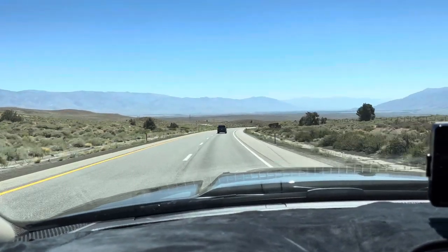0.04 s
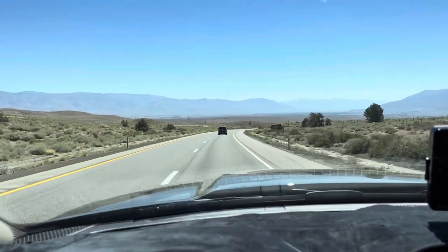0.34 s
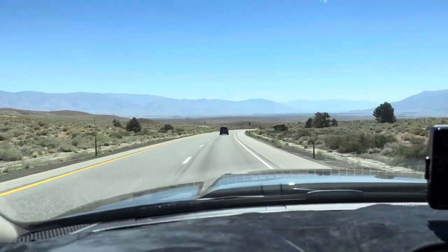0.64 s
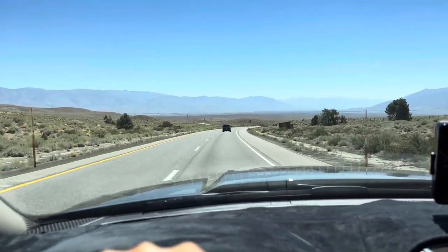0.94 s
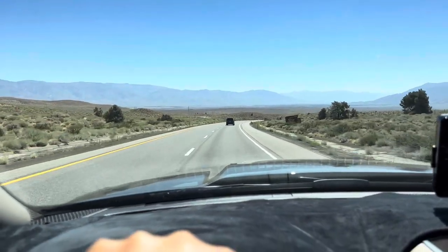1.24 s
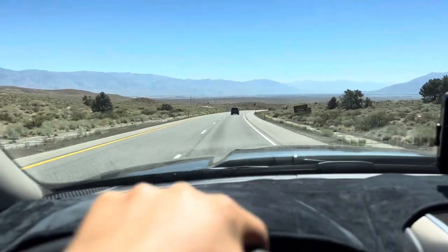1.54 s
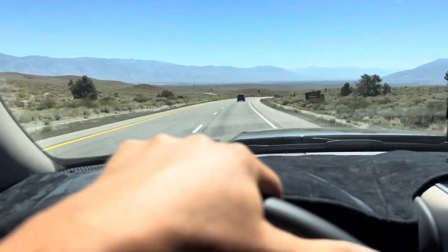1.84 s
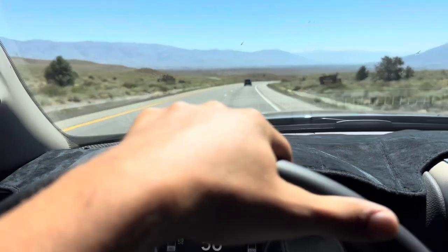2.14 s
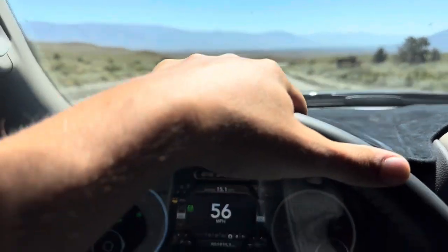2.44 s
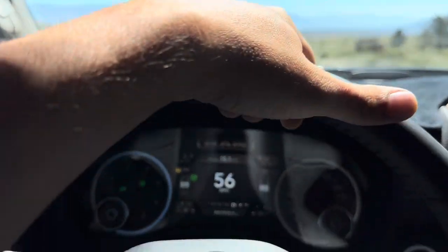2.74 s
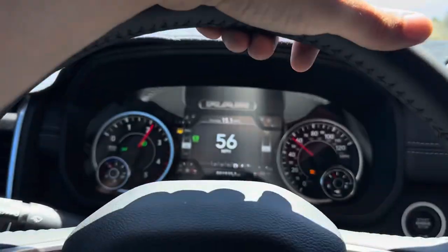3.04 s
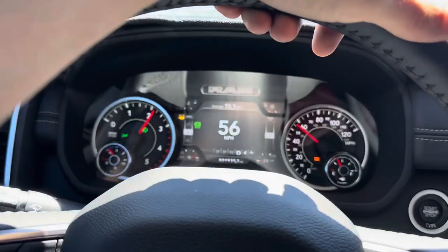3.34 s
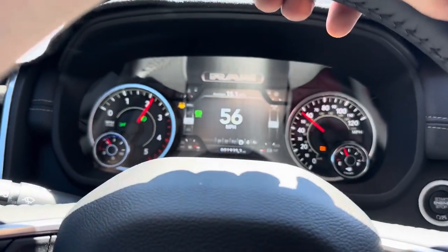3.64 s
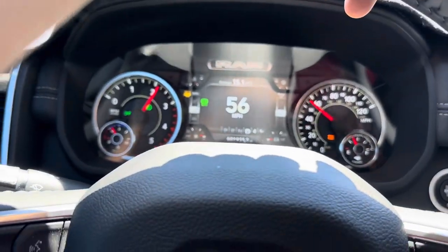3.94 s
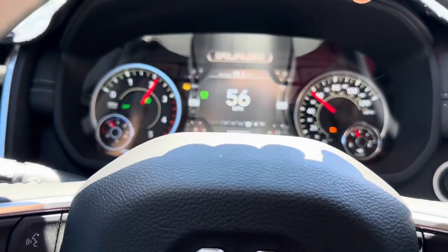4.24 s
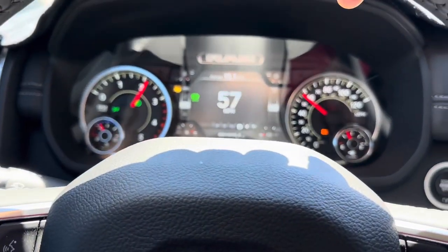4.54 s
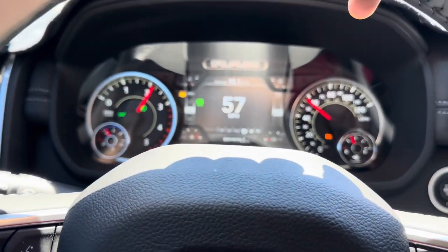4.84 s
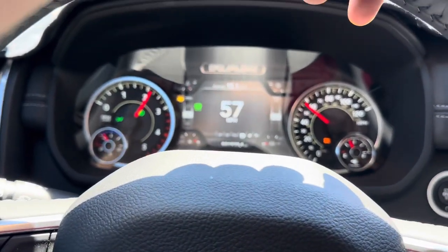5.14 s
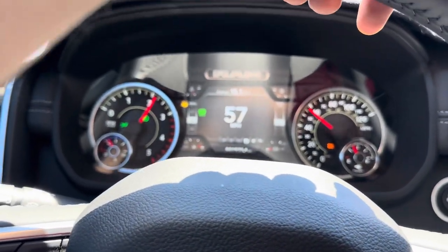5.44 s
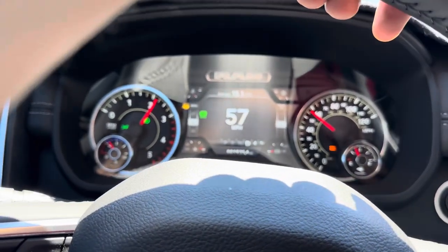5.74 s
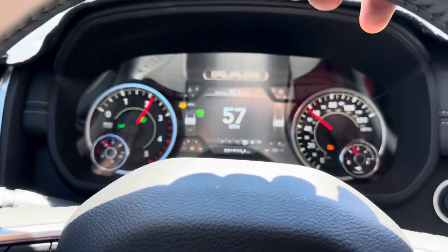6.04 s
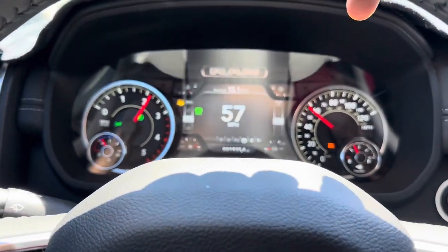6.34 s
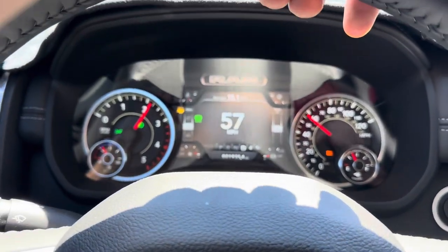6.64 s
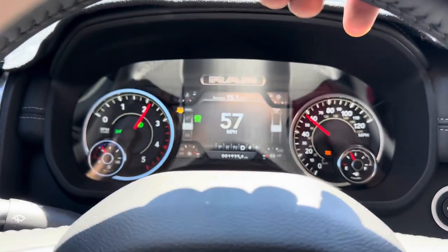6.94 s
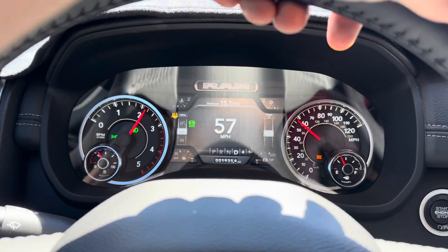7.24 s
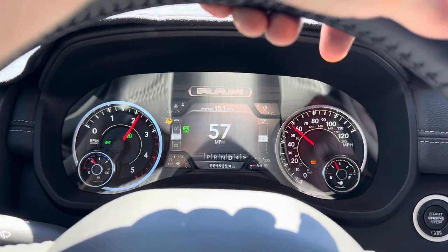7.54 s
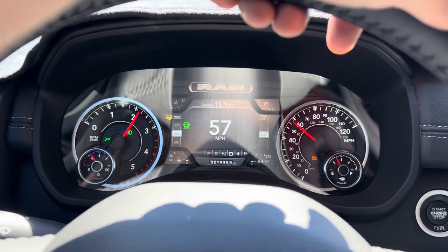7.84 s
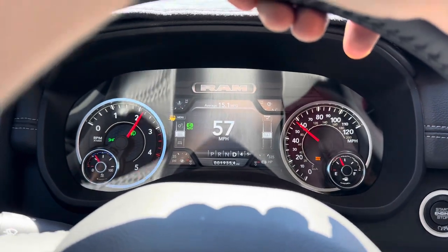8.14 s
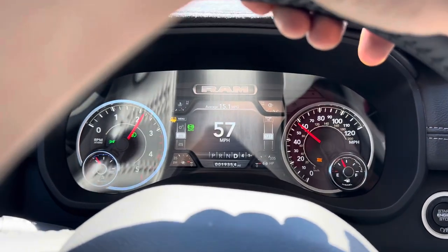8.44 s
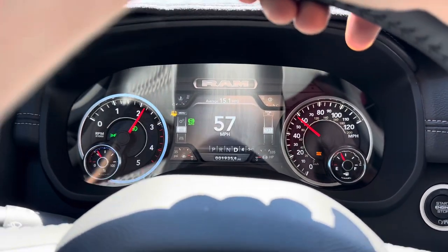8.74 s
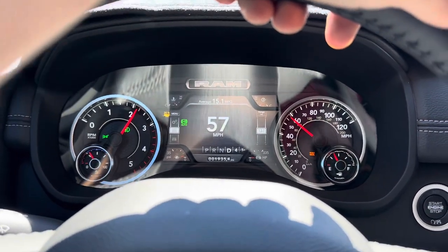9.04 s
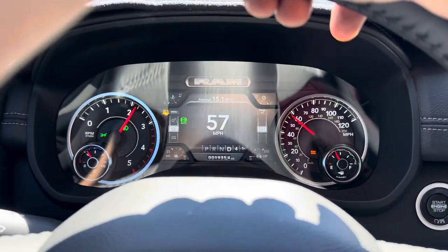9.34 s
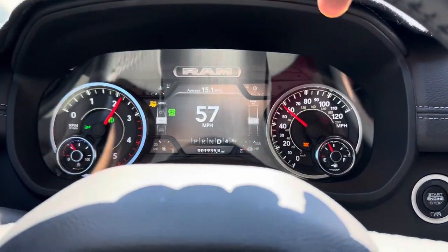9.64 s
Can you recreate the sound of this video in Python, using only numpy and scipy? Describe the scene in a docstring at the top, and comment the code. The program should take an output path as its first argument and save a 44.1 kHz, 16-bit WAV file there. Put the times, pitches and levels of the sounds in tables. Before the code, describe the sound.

Steady diesel engine hum and booming road rumble heard inside a moving truck, with soft air buffeting and light trim ticks.

```python
"""A six-cylinder diesel engine drones near 2180 rpm, holding back a pickup and trailer on a long downhill.
Inside the cab, the road shakes the air into a low boom, which throbs against an engine tone.
Tyres and wind roar outside, plastic trim ticks now and then, and a thin whistle comes and goes.
About two seconds in, the microphone moves from the windscreen to the steering wheel,
where a draught brushes its two openings."""
import sys
import numpy as np
from scipy import signal
from scipy.fft import rfft, irfft, next_fast_len
from scipy.io import wavfile
from scipy.ndimage import uniform_filter1d, map_coordinates

SR = 44100
rng = np.random.default_rng(int(sys.argv[2]) if len(sys.argv) > 2 else 0)


def put_to_file(sound):
    """Save the sound as 16-bit audio at rate SR, in the file named by the first command-line argument."""
    columns = np.atleast_2d(sound).T  # one column per channel
    safe = np.clip(columns, -1, 1)
    whole_steps = np.round(safe * 32767)
    wavfile.write(sys.argv[1], SR, whole_steps.astype(np.int16))


N = 432180


# Swells of the engine's 163 Hz hum. Each row: middle in seconds, lift in dB.
HUM_SWELLS = [(2.6, 5.5), (3.35, 1.5), (4.5, 4), (5.07, 7), (5.35, 3.5), (5.9, 3), (6.5, 4), (6.8, 9.5),
              (8.3, 4.5), (8.85, 2.5), (9.38, 6), (9.62, 5.5)]
# Rise and fall of its 400 Hz note. Each row: time in seconds, lift in dB.
NOTE_LIFT = [(0, 0.5), (2, 1), (3.2, 4.5), (4.1, 6.5), (5, 3.5), (6.6, 2), (7.2, -3.5), (9.8, -3.5)]
def engine(turns, place):
    """The braking engine drones into the cab. One tone matches a pitch the cab rings at, and swells."""
    hum = engine_tones(turns, place, [4.5], waver_db=1, drift=.01)
    note = engine_tones(turns, place, [11], waver_db=1.5, drift=.02)
    others = [row[0] for row in ENGINE_TONES if row[0] not in (2, 4.5, 11)]  # 2 plays in cab_boom
    rest = engine_tones(turns, place, others, waver_db=1.2, drift=.02)
    swells_db = sum(lift_db * hump(s, width_s=.11) for s, lift_db in HUM_SWELLS)
    hum_db = blend(-0.4, -1.0, place) + swells_db
    return amp(hum_db) * hum + amp(curve(NOTE_LIFT)) * note + amp(1) * rest


# Engine tones, with gear whine at the top. Each row: order (vibrations per engine turn), then
# starting levels in dB: left and right at the windscreen, left and right at the wheel.
ENGINE_TONES = [(1.0, -47.5, -52, -50, -41), (1.5, -49, -49, -33.5, -39), (2.0, -26.5, -28.5, -23, -30),
                (2.5, -46, -36.5, -39, -40.5), (3.0, -42, -42, -39.5, -43), (3.5, -32.5, -36, -35, -32.5),
                (4.0, -45.5, -48.5, -42.5, -44.5), (4.5, -23, -26.5, -32, -37),
                (5.0, -40.5, -47, -39.5, -44.5), (5.5, -49.5, -61, -47, -49), (6.0, -38, -47, -45, -50.5),
                (6.5, -52.5, -65.5, -46.5, -53), (7.5, -44.5, -55, -58.5, -59.5),
                (8.5, -59, -50, -62.5, -61.5), (10.0, -65, -52.5, -52, -53),
                (11.0, -51, -45.5, -51.5, -50.5), (12.0, -80.5, -62, -56, -57.5),
                (18.5, -61.5, -62.5, -59, -58.5), (19.0, -61, -62.5, -58, -59),
                (21.0, -58.5, -56.5, -63, -64), (72.1, -96, -96, -85, -83.5),
                (108.0, -96.5, -96.5, -89, -91)]
def engine_tones(turns, place, orders, waver_db, drift):
    """Tones that follow the engine's speed. Echoes in the cab make each louder in some places."""
    out = np.zeros((2, N))
    for order, *levels in ENGINE_TONES:
        if order not in orders:
            continue
        screen, wheel = amp(levels).reshape(2, 2, 1)
        per_turn = round(2 * order) / 2  # halves, as one engine cycle lasts two turns
        phase = 2 * np.pi * (per_turn * turns + rng.random()) + drift * per_turn * wobble(4)
        lead = rng.normal(0, 0.091 * per_turn) * np.array([[1], [-1]])  # left and right are out of step
        level = blend(screen, wheel, place) * amp(waver_db * wobble(5.4))
        out += level * np.sqrt(2) * np.sin(phase + lead)
    return out


# Engine speed. Each row: time in seconds, turns per minute.
ENGINE_RPM = [(0.35, 2178), (1, 2165), (1.6, 2153), (2.6, 2163), (3.4, 2183), (4.3, 2180.0), (5.1, 2185),
              (5.9, 2193), (6.8, 2202), (8.2, 2220), (9.4, 2207.0)]
def engine_turns():
    """How many times the engine has turned so far, at each sample."""
    return np.cumsum(curve(ENGINE_RPM)) / 60 / SR


# Low pitches the cab's air rings at. Each row: pitch in Hz, width in Hz, relative strength in dB.
CAB_RINGS = [(60.3, 16, -4.5), (70, 14, -1)]
# How hard the road shakes the cab. Each row: time in seconds, relative level in dB.
ROAD_SHAKE = [(0, -19.5), (1.8, -21.5), (2.15, -15.5), (2.6, -21), (6.1, -21.5), (7.1, -18.5), (8.8, -22),
              (9.3, -19.5), (9.8, -17)]
def cab_boom(turns, place):
    """The road shakes the cab's air into a rumble, which throbs against a low engine tone."""
    air = ringing(CAB_RINGS)
    rumble = amp(-21.5) * unit(noise(air) + amp(-7.5) * noise(air, channels=2))
    hum = engine_tones(turns, place, [2], waver_db=-0.5, drift=0.16)
    shake_db = curve(ROAD_SHAKE) + wobble(11) - 2
    return amp(shake_db) * steadied(rumble + hum, seconds=0.13)


# The boom's strongest throbs. Each row: middle in seconds, peak level in dB, width in seconds.
BOOM_THROBS = [(0.205, -16.5, 0.034), (0.517, -9, 0.0096), (0.636, -13, 0.027), (0.794, -12.5, 0.018),
               (1.297, -12.5, 0.012), (1.53, -13, .014), (2.018, -14.5, .016), (2.087, -12.5, .016),
               (2.227, -10.5, 0.0085), (2.387, -13.5, 0.023), (2.773, -13.5, 0.012), (3.011, -13, 0.012),
               (3.24, -12.5, 0.017), (3.439, -12, 0.036), (3.777, -14.5, 0.041), (4.041, -12.5, 0.044),
               (4.282, -11, 0.01), (4.797, -11, 0.049), (5.065, -12, 0.016), (5.44, -13.5, 0.016),
               (5.958, -16, 0.047), (6.326, -13, .015), (6.428, -12, 0.018), (6.646, -14.5, 0.021),
               (6.877, -12, 0.026), (7.107, -11, .026), (7.403, -13, .014), (7.677, -12, .022),
               (7.805, -14.5, 0.024), (8.149, -12, 0.013), (8.424, -8, 0.016), (8.984, -13, 0.026),
               (9.085, -11.5, .02), (9.18, -12.5, 0.035), (9.321, -7, 0.01), (9.391, -12, .014),
               (9.487, -7, 0.014), (9.671, -9.5, 0.019), (9.753, -12, 0.026)]
# Pitch of the throbs. Each row: time in seconds, pitch in Hz.
THROB_PITCH = [(0, 70), (5.5, 70.9), (8.4, 63), (9.8, 64.4)]
def with_throbs(boom):
    """The strongest throbs of the cab's low boom, where rumble and engine tone swell together."""
    boom_phase = np.angle(signal.hilbert(boom.mean(0)))  # keeps each throb in step with the boom
    throbs, share = np.zeros(N), np.zeros(N)
    for s, peak_db, width_s in BOOM_THROBS:
        centre = round(s * SR)
        near = np.arange(max(centre - SR // 4, 0), min(centre + SR // 4, N))
        t = near / SR - s
        swell = np.exp(-.5 * (t / width_s) ** 2)
        hz = np.interp(s, *np.transpose(THROB_PITCH))
        throbs[near] += amp(peak_db) * swell * np.cos(2 * np.pi * hz * t + boom_phase[centre])
        share[near] = np.maximum(share[near], np.sqrt(swell))
    return boom * (1 - share) + throbs


# Strength of the draught. Each row: time in seconds, relative level in dB.
DRAUGHT_LEVEL = [(0, -44), (1.1, -47), (1.8, -31), (2.9, -21.5), (4.35, -27.5), (5.6, -25.5), (6.35, -28),
                 (7.5, -24), (8.6, -25.5), (8.9, -22), (9.8, -22.5)]
def draught():
    """Swirls of air buffet each microphone opening on its own."""
    deep = colour([(18, -36.5), (35, -12.5), (62, 4), (85, -1), (105, 0), (160, -3), (250, -15.5),
                   (420, -28), (700, -40), (2000, -85), (8000, -120)])
    swirls = unit(noise(deep, channels=2))
    lumps = amp(2 * np.array([wobble(16), wobble(17)]))
    return amp(curve(DRAUGHT_LEVEL) + 2) * unit(swirls * lumps)


# The draught's sharpest puffs. Each row: middle in seconds, peak level in dB.
SHARP_PUFFS = [(2.87, -27), (3.2, -36.5), (4.07, -36), (5.338, -32), (5.86, -35), (6.183, -34),
               (6.761, -31), (7.673, -25.5), (8.28, -32.5), (8.88, -36), (9.0, -34), (9.516, -38)]
def puffs():
    """Faster swirls sound brighter and hit both openings together. Weak ones come at random."""
    strong = sum(amp(db) * hump(s, width_s=0.023) for s, db in SHARP_PUFFS)
    weak = amp(curve(DRAUGHT_LEVEL) - 14.5 + 2.5 * wobble(14))
    body = colour([(60, -25.5), (130, -1), (200, -3), (330, -5.5), (450, -12.5), (700, -29.5),
                   (2000, -56), (8000, -110)])
    return (strong + weak) * unit(noise(body) + 0.62 * noise(body, channels=2))


# The roar through the closed cab. Each row: frequency in Hz, relative level in dB of the noise
# both sides share, and of the noise that is added on the left and taken away on the right.
ROAR_COLOUR = [(18, -69, -79), (34.8, -52, -68), (59.6, -47, -54), (85, -48.5, -54), (102, -51, -62.5),
               (152, -53.5, -56), (242, -59.5, -61), (425, -67.5, -76), (470, -72.5, -73.5),
               (785, -78.5, -72.5), (1270, -82, -83), (1705, -92, -90), (2620, -103, -103),
               (4200, -109, -109), (6200, -115, -116), (7450, -123, -125), (9800, -125, -130),
               (10400, -141, -146), (15000, -146, -150)]
# Fuzzy notes that ring in the cab. Each row: pitch in Hz, width in Hz, # relative level in dB at the windscreen
# and at the wheel.
CAB_NOTES = [(213.5, 70, -60, -41.5), (353, 90, -58, -50.5), (435, 40, -60.5, -50), (627, 54, -54, -57.5),
             (681, 30, -58, -57.5), (819, 90, -56, -54.5), (952.5, 25, -66, -62.5),
             (1111.6, 55, -74.5, -58), (1172, 30, -60.5, -73)]
# Rise and fall of the roar and the wind. Each row: time in seconds, relative level in dB.
ROAR_RISE = [(0, -43.5), (2.3, -45), (3.3, -44.5), (4.3, -44.5), (5.5, -44), (6.3, -44), (7.1, -44),
             (7.8, -44), (8.4, -43), (9.2, -43), (9.8, -42)]
def road_roar(turns, place):
    """Tyres and wind roar, pulsing slightly as the engine fires three times a turn."""
    shared = noise(colour([(hz, db) for hz, db, _ in ROAR_COLOUR]))[0]
    opposed = noise(colour([(hz, db) for hz, _, db in ROAR_COLOUR]))[0]
    out = np.array([shared + opposed, shared - opposed])
    tyres = filtered(out, lambda hz: 1 / (1 + (hz / 1500) ** 4))
    out += (amp(1.16 * wobble(14)) - 1) * tyres  # the road surface varies, the hiss stays even
    out *= 1 + 0.065 * np.cos(2 * np.pi * 3 * turns)
    for centre_hz, width_hz, screen_db, wheel_db in CAB_NOTES:
        out += amp(blend(screen_db, wheel_db, place)) * fuzzy_note(centre_hz, width_hz)
    return out * unit(amp(curve(ROAR_RISE)))


# Wind on the glass. Each row: frequency in Hz, relative level in dB.
WIND_COLOUR = [(300, -85), (550, -65.5), (790, -71.5), (910, -72.5), (1030, -79), (1300, -79.5),
               (1600, -86), (2100, -91.5), (3000, -101), (4200, -111), (7000, -122), (12000, -150)]
def wind_on_glass(place):
    """Wind on the windscreen is heard first on the right; on the driver's window, first on the left."""
    def wind(left_lead_ms):
        shift = np.array([[1j], [-1j]]) * np.pi * left_lead_ms / 1000
        return filtered(noise(colour(WIND_COLOUR)), lambda hz: np.exp(shift * hz))
    screen = amp(-3.5) * np.sqrt(1 - place) * wind(left_lead_ms=-0.36)
    window = amp(-5.5) * np.sqrt(place) * wind(left_lead_ms=0.34)
    return (screen + window) * unit(amp(curve(ROAR_RISE)))


def hollowed(x, depth=0.22):
    """Echoes in the cab partly cancel one narrow band of the noise."""
    return filtered(x, lambda hz: 1 - depth * resonance(hz, centre_hz=925, width_hz=57))


# Ticks of the trim. Each row: start in seconds, relative level in dB, ring (0 dry snap, 1 all ring).
TRIM_TICKS = [(.095, -51.5, .05), (.306, -53.5, .08), (1.687, -58.5, .12), (2.148, -56, .15),
              (2.512, -58.5, .2), (2.780, -54, .08), (2.909, -62, .5), (3.086, -56.5, .09),
              (8.793, -50.5, .06), (8.999, -55, .15), (9.072, -64, .8), (9.121, -57, .8), (9.134, -57, .8),
              (9.236, -54, .9), (9.277, -56.5, .9), (9.532, -63, .8), (9.589, -50.5, .85)]
# A snap and its rebounds. Each row: delay in seconds, level in dB compared with the first hit.
REBOUNDS = [(0, 0), (.008, -6), (.031, -16), (.073, -17)]
# Pitches the panels ring at. Each row: pitch in Hz, width in Hz, relative strength in dB.
PANEL_RINGS = [(3150, 300, -4), (4300, 170, 2), (5300, 650, -7.5), (6150, 420, -2.5), (8950, 500, -10)]
# The sound of a dry snap. Each row: frequency in Hz, relative level in dB.
SNAP_COLOUR = [(1200, -19), (3000, -7), (4600, -5.5), (5600, -1.5), (6400, -1), (6850, 2), (7200, -9),
               (8400, -9.5), (9700, -9), (10700, -16), (11200, -26), (13000, -24), (15000, -16),
               (15600, -21)]
# Loose trim chatters when the cab shakes hardest. Each row: time in seconds, relative level in dB.
CHATTER_LEVEL = [(0, -110), (8.9, -105), (9.06, -77.5), (9.3, -79.5), (9.42, -86), (9.55, -84.5),
                 (9.8, -89)]
def plastic_trim(slip_s=.010, left_louder_db=4.5):
    """Plastic panels on the left stick and slip, so they snap, ring and chatter."""
    def scratch(shape):
        hiss = noise(shape) + noise(shape, channels=2)
        return unit(hiss * amp(2 * wobble(650)))
    t = np.arange(SR // 10) / SR
    slip = amp(-60 * np.maximum(t - slip_s, 0) / .04)  # holds, then falls 60 dB in .04 s
    echo = amp(-13 - 60 * t / .15)
    tick = (1 - np.exp(-t / 0.00034)) * np.hypot(slip, echo)
    ring_level, snap_power = np.zeros((2, N + SR))
    for s, db, ring in TRIM_TICKS:
        ring_level[round(s * SR):][:len(t)] += amp(db) * np.sqrt(ring) * tick
        for delay_s, drop_db in REBOUNDS:
            snap_power[round((s + delay_s) * SR):][:len(t)] += (1 - ring) * (amp(db + drop_db) * tick) ** 2
    chatter = amp(curve(CHATTER_LEVEL)) * unit(amp(6 * wobble(130)))
    rings = (amp(-9.3) * ring_level[:N] + chatter) * scratch(ringing(PANEL_RINGS))
    snaps = amp(-8.8) * np.sqrt(snap_power[:N]) * scratch(colour(SNAP_COLOUR))
    return (rings + snaps) * amp([[left_louder_db / 2], [-left_louder_db / 2]])


# Loudness of the whistle. Each row: time in seconds, level in dB.
WHISTLE_LEVEL = [(0, -86.5), (2.5, -85.5), (3.2, -77.5), (5.7, -78), (7, -75), (8.2, -75.5), (8.7, -77.5),
                 (9.8, -85.5)]
def whistle():
    """A thin whistle, perhaps the turbocharger, comes and goes."""
    note = fuzzy_note(centre_hz=2944, width_hz=87)
    return amp(curve(WHISTLE_LEVEL) + 0.7 * wobble(5.6)) * note


# Very faint high whines. Each row: pitch in Hz, level in dB.
HIGH_WHINES = [(7800, -95), (9601, -83), (11700, -99), (12900, -105)]
# The faintest, highest hiss. Each row: frequency in Hz, level in dB per Hz.
HISS_COLOUR = [(12400, -175), (12750, -135), (13500, -135), (14350, -136.5), (14700, -175)]
def whines(bass):
    """High whines flutter as the cab vibrates, with a trace of hiss."""
    tones = sum(amp(db) * np.sin(2 * np.pi * hz * np.arange(N) / SR) for hz, db in HIGH_WHINES)
    flutter = steadied(bass, seconds=.05).mean(0)
    return flutter * tones + noise(colour(HISS_COLOUR))


def amp(db):
    """Turn decibels into a number to multiply by."""
    return 10 ** (np.asarray(db) / 20)


def unit(x):
    """Scale x to an average power of 1."""
    return x / np.sqrt(np.mean(x ** 2) + 1e-20)


def blend(at_screen, at_wheel, place):
    """Slide from the windscreen's value (place 0) to the wheel's (place 1)."""
    return at_screen + (at_wheel - at_screen) * place


def curve(rows):
    """Join (seconds, value) rows with straight lines, one value per sample."""
    return np.interp(np.arange(N) / SR, *np.transpose(rows))


def hump(centre_s, width_s):
    """A smooth rise to 1 and back, at 0.6 when width_s from its centre."""
    return np.exp(-.5 * ((np.arange(N) / SR - centre_s) / width_s) ** 2)


def wobble(rate):
    """A smooth curve through rate random points a second."""
    points = rng.standard_normal(int(N * rate / SR) + 4)
    coarse = np.arange(0, N, 64)
    return np.interp(np.arange(N), coarse, map_coordinates(points, [coarse * rate / SR]))


def colour(points):
    """Join (Hz, dB) points into a response: how strong each frequency is."""
    f, db = np.transpose(points)
    return lambda hz: amp(np.interp(np.log(hz + 1), np.log(f + 1), db))


def resonance(hz, centre_hz, width_hz):
    """The response of something that rings at one pitch."""
    return 1j * hz * width_hz / (centre_hz ** 2 - hz ** 2 + 1j * hz * width_hz)


def ringing(rows):
    """The response of something that rings at several pitches."""
    return lambda hz: sum(amp(db) * np.abs(resonance(hz, pitch, width)) ** 2 for pitch, width, db in rows)


def filtered(x, response):
    """Multiply each frequency in x by the response."""
    size = next_fast_len(N + SR // 2)
    return irfft(rfft(x, size) * response(np.fft.rfftfreq(size, 1 / SR)), size)[..., :N]


def noise(response, channels=1):
    """Noise shaped by the response."""
    return filtered(rng.standard_normal((channels, N)) * np.sqrt(SR / 2), response)


def fuzzy_note(centre_hz, width_hz):
    """Noise so narrow that it has a pitch."""
    return unit(noise(lambda hz: resonance(hz, centre_hz, width_hz) ** 2))


def steadied(x, seconds):
    """Even out slow swells, keeping the power near 1."""
    size = int(seconds * SR)
    power = uniform_filter1d(uniform_filter1d(x.mean(0) ** 2, size), size)
    return x / np.sqrt(np.abs(power) + 1e-12)


# Where the microphone is. Each row: time in seconds, place (0 windscreen, 1 steering wheel).
MIC_PLACE = [(0, 0.062), (1.83, 0.03), (1.92, 0.93), (2.7, 0.99), (9.8, 0.91)]
def scene():
    """Engine, cab and road as heard from the driver's seat."""
    turns = engine_turns()
    place = curve(MIC_PLACE)
    bass = with_throbs(cab_boom(turns, place)) + engine(turns, place)
    outside = hollowed(road_roar(turns, place) + wind_on_glass(place))
    return bass + outside + draught() + puffs() + plastic_trim() + whistle() + whines(bass)


def record(dry, low_hz=16, top_hz=15650, fade_s=.004):
    """The microphone drops the deepest rumble and the highest treble. Both ends fade quickly."""
    from_end = np.minimum(np.arange(N), np.arange(N)[::-1])
    fade = np.minimum(from_end / (fade_s * SR), 1)
    return filtered(dry * fade, lambda hz: (hz < top_hz) * hz ** 2 / np.sqrt(hz ** 4 + low_hz ** 4))


dry = scene()
out = record(dry)
put_to_file(out)
```